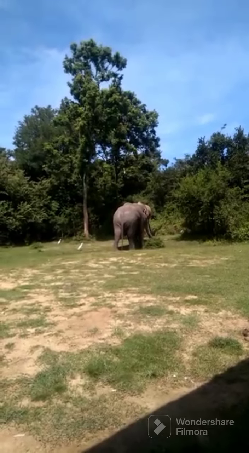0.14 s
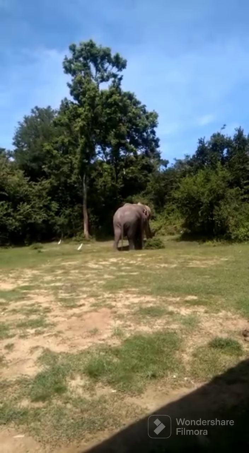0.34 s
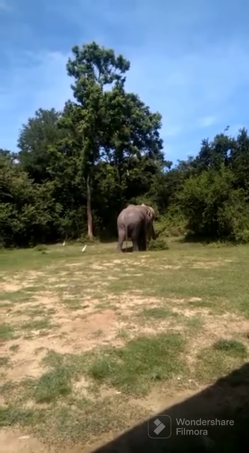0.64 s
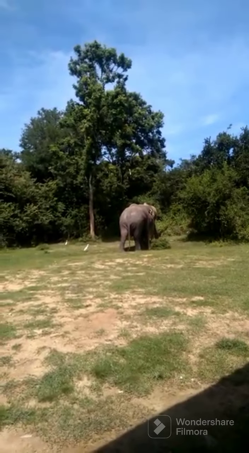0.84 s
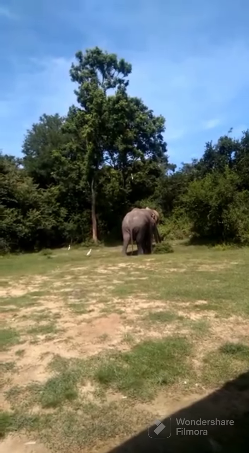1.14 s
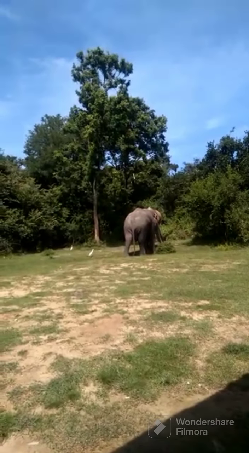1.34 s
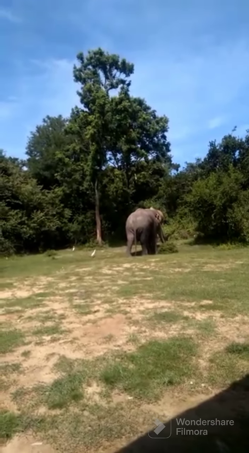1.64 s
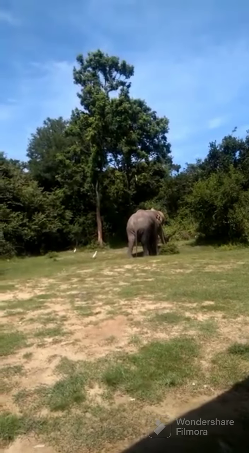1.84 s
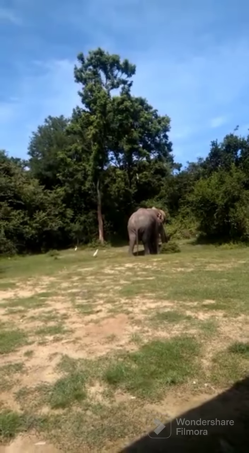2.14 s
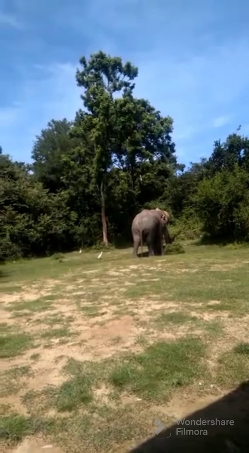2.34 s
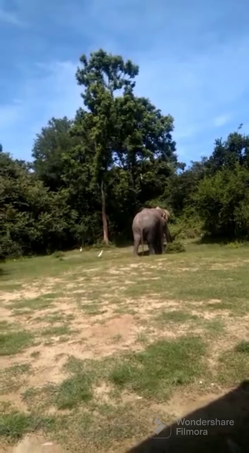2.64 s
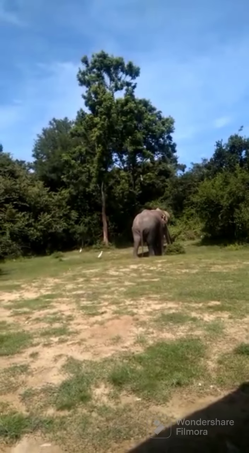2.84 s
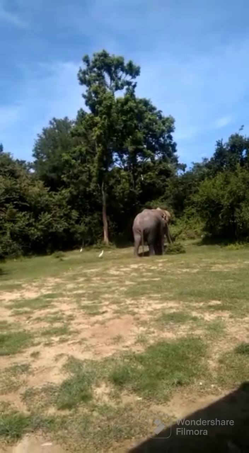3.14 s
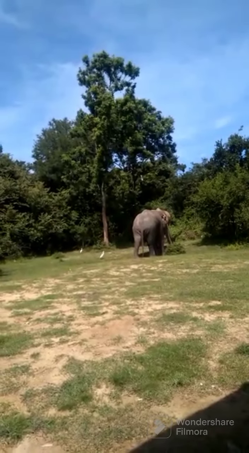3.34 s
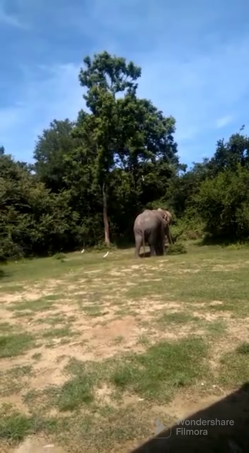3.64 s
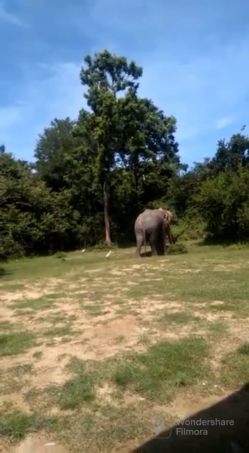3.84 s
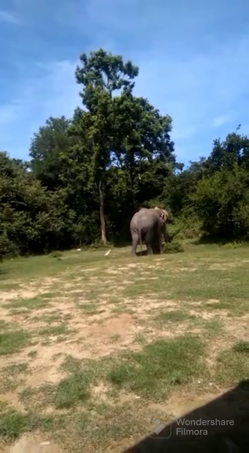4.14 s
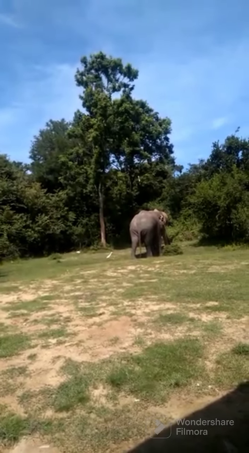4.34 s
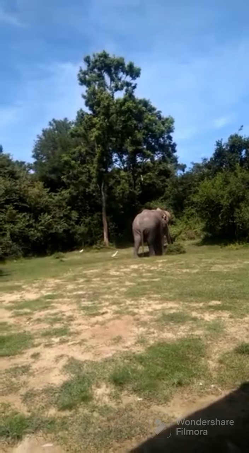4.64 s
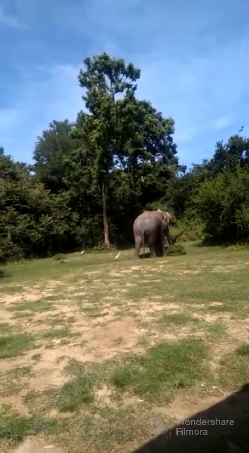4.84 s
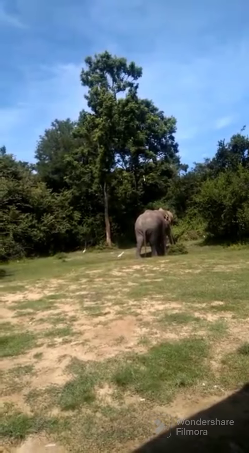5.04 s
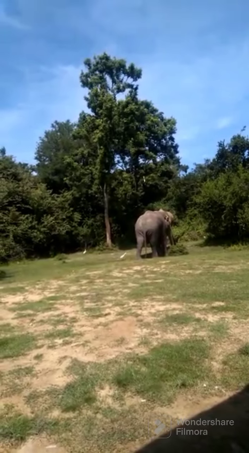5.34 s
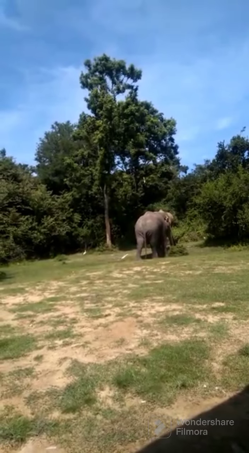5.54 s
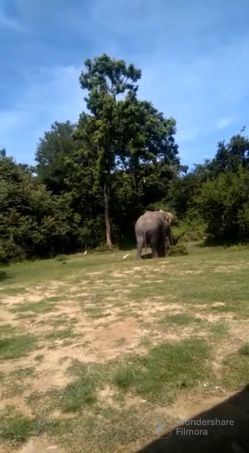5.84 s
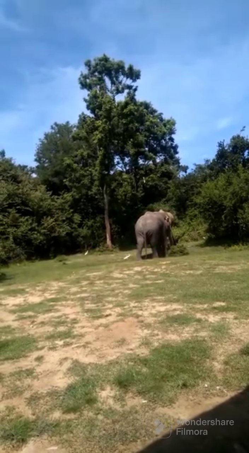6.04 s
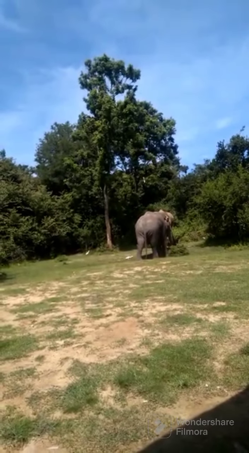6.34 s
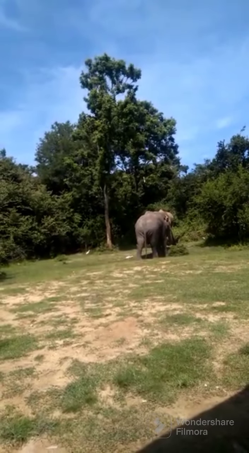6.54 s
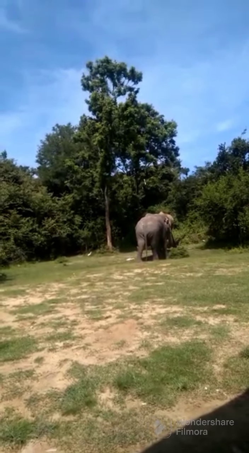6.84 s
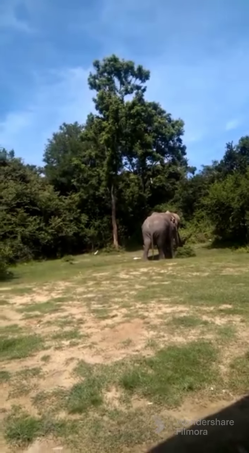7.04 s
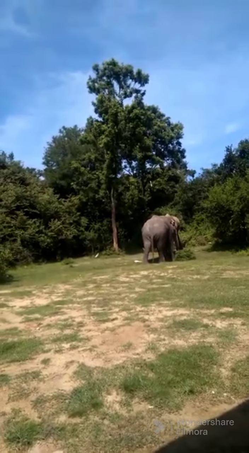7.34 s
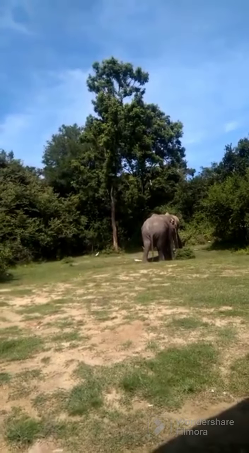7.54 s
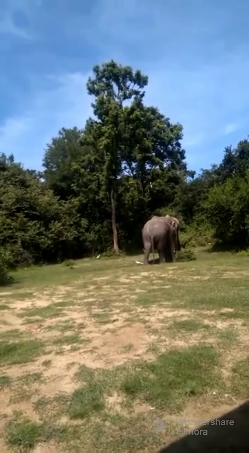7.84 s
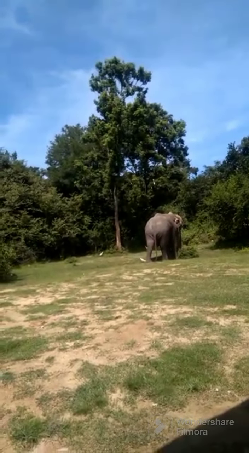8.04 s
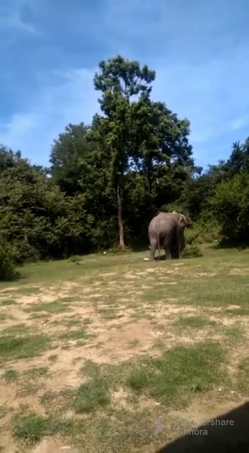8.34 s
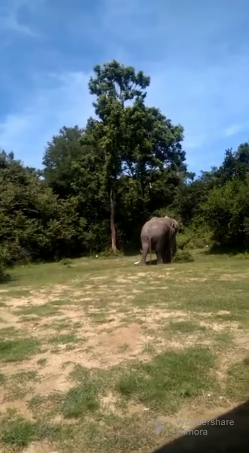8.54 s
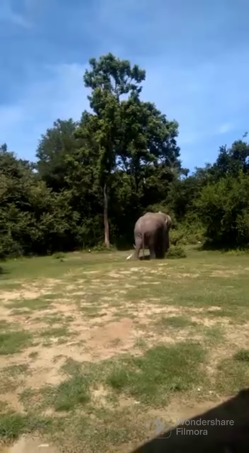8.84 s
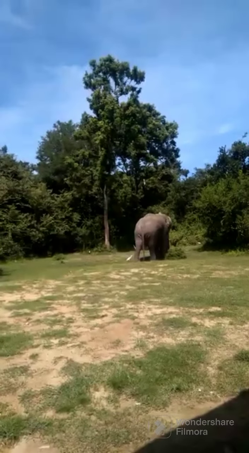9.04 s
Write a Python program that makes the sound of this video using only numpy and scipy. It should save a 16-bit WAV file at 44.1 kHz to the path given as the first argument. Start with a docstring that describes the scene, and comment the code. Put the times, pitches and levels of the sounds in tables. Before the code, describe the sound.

Rattling trills burst from a nearby animal in a quiet clearing, a farther one answers, and sparse bird whistles and hoarse caws echo among trees.

```python
"""A forest-edge clearing opens inside an animal's buzzing trill (pulse bursts through a throat) over noise-band
insects, streaky flickering noise and light wind. Thin sine notes, doves' falling whistles and hissy noise
chirps join within a second, then hoarse calls of resonated rough pulses. Near trills return at 3 and 7 s;
between them a farther animal answers, growing louder. Throughout, the phone's suppressor thins steady noise,
its input hisses, and its gate pulls everything down between loud sounds."""
import sys
import numpy as np
from scipy import signal
from scipy.io import wavfile
from scipy.ndimage import uniform_filter1d

SR = 44100
rng = np.random.default_rng(int(sys.argv[2]) if len(sys.argv) > 2 else 0)


def gain_from_db(level_db):
    """Turn a decibel level (scalar or array-like) into a linear amplitude factor."""
    decades = np.asarray(level_db, float) / 20
    return 10 ** decades


def generate_wav(sig):
    """Save sig (samples, or channels by samples) to the path in sys.argv[1] as 16-bit PCM at SR."""
    pcm = np.round(np.clip(np.atleast_2d(sig).T, -1, 1) * 32767).astype(np.int16)
    wavfile.write(sys.argv[1], SR, pcm)


N = 404823
TIME = np.arange(N) / SR


def rms_one(x):
    """Scale to rms 1."""
    return x / np.sqrt(np.mean(x ** 2) + 1e-20)


def band(x, low_hz, high_hz, order=3):
    """Butterworth band-pass."""
    return signal.sosfilt(signal.butter(order, [low_hz, high_hz], "band", fs=SR, output="sos"), x)


def drift(points_per_s):
    """Slow chance of rms 1: random points joined by straight lines."""
    return rms_one(np.interp(TIME * points_per_s, np.arange(2000), rng.standard_normal(2000)))


def throat(x, modes):
    """Parallel resonances, each applied twice so that the valleys stay dark; rms 1."""
    out = 0
    for k, (hz, width_hz, db) in enumerate(modes):
        r = np.exp(-np.pi * width_hz / SR)
        b = (1 - r * r) / 2 * np.array([1, 0, -1])
        a = [1, -2 * r * np.cos(2 * np.pi * hz / SR), r * r]
        resonance = signal.lfilter(b, a, signal.lfilter(b, a, x))
        out = out + (-1) ** k * gain_from_db(db) * resonance  # alternating polarity
    return rms_one(out)


def buzz(pulses_per_s, jitter, rough):
    """Pulses uneven in time and level, mixed with breath noise."""
    cycles = np.cumsum(pulses_per_s * (1 + jitter * drift(150)) / SR)
    pulses = np.diff(np.floor(cycles), prepend=0) * gain_from_db(3.0 * rng.standard_normal(N))
    return rms_one(pulses) + rough * rng.standard_normal(N)


def swell(start_s, length_s, rise_share):
    """Envelope 0-1: up over a share of the length, then a rounded fall."""
    share = np.clip((TIME - start_s) / length_s, 0, 1)
    return np.sin(np.pi / 2 * np.minimum(share / rise_share, (1 - share) / (1 - rise_share))) ** 2


def trees(x, wet_db, t60_s):
    """Direct sound plus the dense, decaying echoes of trunks and leaves."""
    t = TIME[:SR]
    echoes = rng.standard_normal(SR) * gain_from_db(-60 * t / t60_s) * (t > .004)
    return x + gain_from_db(wet_db) * signal.fftconvolve(x, echoes / np.linalg.norm(echoes))[:N]


def coloured(spectrum, flicker_db=0, hold_s=.1):
    """Noise of rms 1 with a spectrum in (Hz, dB); each 90 Hz strip may come and go on its own."""
    hz, t, cells = signal.stft(rng.standard_normal(N), SR, nperseg=512)
    r = np.exp(-t[1] / hold_s)
    strips = rms_one(signal.lfilter([1], [1, -2 * r, r * r], rng.standard_normal(cells.shape), axis=1))
    points = np.array(spectrum)
    colour_db = np.interp(np.log(hz + 1), np.log(points[:, 0]), points[:, 1])
    shaped = cells * gain_from_db(colour_db[:, None] + flicker_db * strips)
    return rms_one(signal.istft(shaped, SR, nperseg=512)[1][:N])


def trill(bursts, modes, pulses_per_s, burst_s, wet_db, t60_s):
    """Each burst (centre s, dB) is a short hump of fast pulses through the throat."""
    peaks = np.zeros(N)
    for centre_s, db in bursts:
        peaks[round(centre_s * SR)] = gain_from_db(db)
    hump = np.hanning(round(burst_s * SR)) ** .75
    envelope = np.maximum(signal.fftconvolve(peaks, hump, "same"), 0)
    voice = throat(buzz(pulses_per_s, jitter=.15, rough=0.65), modes)
    # steady effort within a burst
    voice = voice / np.sqrt(uniform_filter1d(voice ** 2, round(.008 * SR)) + 0.0015)
    return trees(envelope * voice, wet_db, t60_s)


# Near trills. Each row: first burst in s, first gap in s, growth of the gap in s per burst,
# drag of the last burst in s, full level in dB.
TRILLS = [(-0.2652, .03116, .00072, .026, -36), (3.0358, 0.029, .000973, 0.022, -33),
          (7.1422, .02926, .000776, .04, -33)]
# Number of bursts in each trill.
TRILL_BURSTS = [29, 28, 31]
# Weak afterthought to the second trill: centre in s, level in dB.
STRAY_BURST = (4.29, -43.5)
SWELL_DB, SWELL_BURSTS = -21, 3.1  # starting level re full, and bursts over which the gap closes
DRAG_BURSTS, TIRING_DB = 1.5, -4  # over the last bursts the drag builds and the level sags


def slowing_bursts():
    """Burst times and levels: a swell, ever longer gaps, and a dragging, weaker end."""
    rows = [STRAY_BURST]
    for (start_s, gap_s, growth_s, drag_s, db), count in zip(TRILLS, TRILL_BURSTS):
        k = np.arange(count)
        ending = np.exp((k - k[-1]) / DRAG_BURSTS)
        level_db = db + SWELL_DB * np.exp(-k / SWELL_BURSTS) + TIRING_DB * ending
        level_db = level_db + .6 * rng.standard_normal(count)
        times_s = start_s + gap_s * k + growth_s * k * k / 2 + drag_s * ending
        rows += zip(times_s, level_db)
    return [(s, db) for s, db in rows if s > 0]


# Near animal's throat. Each row: resonance in Hz, width of one pass in Hz, level in dB.
TRILL_THROAT = [(2380, 430, -20), (2930, 400, -14.5), (3670, 400, -0.5), (4010, 440, -4), (4315, 470, -2.5),
                (4798, 330, -4), (5422, 685, -13)]


def near_trills():
    """Three slowing trills, the first already under way: pulse bursts through the near throat."""
    return trill(slowing_bursts(), TRILL_THROAT, pulses_per_s=800, burst_s=.027, wet_db=-8.0, t60_s=0.85)


# Insect chorus. Each row: time in s, level in dB.
INSECTS = [(0, -58), (1, -59.5), (2, -55.5), (3, -57), (4, -60.5), (5, -62.5), (6, -62.5), (7, -62),
           (8, -57), (9.2, -63.5)]


def insects():
    """Flickering noise band near 8 kHz."""
    spectrum = [(7200, -39.5), (7600, -4), (8150, 2), (8600, -10), (9200, -6), (9600, -43.5)]
    chorus = coloured(spectrum, flicker_db=5.0, hold_s=0.021)
    return gain_from_db(np.interp(TIME, *np.transpose(INSECTS)) + 1.0 * drift(13)) * chorus


# Wind at the microphone. Each row: time in s, level in dB.
WIND = [(0, -70), (0.5, -66), (0.8, -76), (1.1, -71), (1.7, -77), (2.2, -71), (2.9, -74.5), (3.75, -64.5),
        (4.0, -72), (4.6, -75), (5.0, -69), (5.4, -77), (5.6, -68.5), (6.4, -70), (6.8, -77.5),
        (7.35, -65.5), (7.75, -76), (8.2, -56.5), (8.55, -67.5), (9.1, -63)]


def wind():
    """Lumps of low noise, strongest at 60-76 Hz, with a wandering level."""
    narrow = band(rng.standard_normal(N), 60, 76, order=2)
    wide = band(rng.standard_normal(N), 45, 140, order=2)
    level_db = np.interp(TIME, *np.transpose(WIND)) + 2.6 * drift(6)
    return gain_from_db(level_db) * rms_one(narrow + 0.32 * wide)


# Streaky noise spectrum. Each row: frequency in Hz, relative density in dB.
STREAKS = [(150, -3), (300, -4.5), (700, -9), (1300, -19), (2200, 1), (3500, -6.5), (4300, 0), (5700, 3),
           (7000, -1.5), (9300, -10.5), (11000, -14.5), (13000, -29)]
STREAKS_DB = -61


def streaks():
    """Faint coloured background noise whose narrow strips flicker, streaky like suppressor residue."""
    return gain_from_db(STREAKS_DB + 0.73 * drift(3.8)) * coloured(STREAKS, flicker_db=5.5, hold_s=.03)


# Far birds. Each row: start in s, length in s, first pitch in Hz, last pitch in Hz, dry level in dB.
NOTES = [(0.2, 0.68, 2166, 2139, -64.5), (1.074, 0.79, 2140, 2131, -63), (1.034, 0.035, 8080, 7590, -52.5),
         (1.202, 1.075, 2371, 2512, -65), (1.71, 0.036, 1466, 1415, -67), (1.742, 0.14, 2060, 1958, -61),
         (1.75, 0.21, 2996, 3163, -70.0), (1.778, 0.15, 1750.0, 1674, -66.5),
         (2.113, 0.065, 1700, 1616, -71.5), (2.136, 0.14, 2970, 2942, -70.5),
         (2.694, 0.59, 3010, 3064, -69.5), (3.243, 0.24, 2250.0, 2250.0, -63),
         (4.28, 0.44, 2386, 2386, -68.5), (4.28, 0.068, 1679, 1594, -60), (5.483, 0.089, 1868, 1840, -57.5),
         (5.506, 0.12, 2250.0, 2183, -67), (4.998, 0.17, 3320, 3080, -62),
         (5.954, 0.088, 2155, 2154, -64.5), (6.394, 0.48, 2151, 2122, -62.5),
         (6.502, 0.036, 1525, 1290, -69), (7.277, 0.55, 2443, 2444, -65), (8.659, 0.067, 1501, 1306, -59.5)]


def notes():
    """Thin sines, wavering in pitch and level, with strong echo."""
    out = np.zeros(N)
    for start_s, length_s, first_hz, last_hz, db in NOTES:
        hz = np.interp(TIME, [start_s, start_s + length_s], [first_hz, last_hz]) + 14 * drift(90)
        envelope = swell(start_s, length_s, 0.58) ** 0.13 * gain_from_db(db + 2.6 * drift(40))
        out += np.sqrt(2) * envelope * np.sin(2 * np.pi * np.cumsum(hz) / SR)
    return trees(out, wet_db=-1.5, t60_s=0.52)


# Doves. Each row: start in s, rise in s, length in s, top pitch in Hz, fall time in s,
# level in dB ahead of the strength curve.
WHISTLES = [(0.62, 0.026, .23, 2410, 0.16, -44), (4.64, 0.028, .26, 2469, .148, -39),
            (4.825, .015, .4, 2592, .125, -27), (5.18, .03, .21, 2420, .13, -39),
            (8.515, .09, .28, 2402, .165, -40.5)]
# Strength along the fall. Each row: pitch in Hz, gain in dB.
WHISTLE_STRENGTH = [(1450, -19.5), (1600, -12), (1750, -12.5), (1900, -2.5), (2050, 0), (2250, -1.5),
                    (2450, -2), (2600, -5)]
# Overtones. Each row: multiple of the pitch, level in dB re the fundamental when that is at -34 dB.
OVERTONES = [(2, -36), (3, -32.5), (4, -55), (5, -34), (6, -47.5)]
WHISTLE_REST_HZ, FALL_SHAPE = 1449, 1.25  # pitch sinks towards rest, lingering at the top first
WHISTLE_FADE_S = .03
OVERTONES_THIN_HZ, OVERTONES_THIN_DB_PER_HZ = 2080, 0.2  # below this pitch the overtones die away


def whistles():
    """Near-sine glides; patchy overtones grow faster than the fundamental with effort."""
    out = np.zeros(N)
    for start_s, rise_s, length_s, top_hz, fall_s, db in WHISTLES:
        t = np.arange(round(length_s * SR)) / SR
        part = slice(round(start_s * SR), round(start_s * SR) + len(t))
        hz = WHISTLE_REST_HZ + (top_hz - WHISTLE_REST_HZ) * np.exp(-(t / fall_s) ** FALL_SHAPE)
        level_db = db + np.interp(hz, *np.transpose(WHISTLE_STRENGTH))
        phase = 2 * np.pi * np.cumsum(hz) / SR
        thin_db = OVERTONES_THIN_DB_PER_HZ * np.minimum(hz - OVERTONES_THIN_HZ, 0)
        effort_db = 1.13 * (level_db + 34.0)
        tone = np.sin(phase)
        for k, overtone_db in OVERTONES:
            patchy_db = 3.3 * drift(35)[part]
            tone = tone + gain_from_db(overtone_db + thin_db + effort_db + patchy_db) * np.sin(k * phase)
        ramps = np.minimum(1, np.minimum(t / rise_s, (length_s - t) / WHISTLE_FADE_S))
        out[part] += gain_from_db(level_db) * tone * ramps
    out = out * gain_from_db(1.5 * drift(60))  # slight random flutter of the level
    # one strong dull echo beats against the glide
    echo = band(np.interp(TIME - .012, TIME, out), 1000, 3200, order=2)
    return trees(out + gain_from_db(-5) * echo, wet_db=-8.5, t60_s=.7)


# Chirps. Each row: start in s, length in s ahead of a 1.314 stretch, low edge in Hz, high edge in Hz,
# level in dB.
CHIRPS = [(0.789, 0.4, 7730, 8230, -51.5), (0.81, 0.35, 6560, 6900, -62), (1.009, 0.26, 7410, 7970, -62.5),
          (2.209, 0.3, 7420, 8190, -49), (2.305, 0.21, 6125, 7210, -53.5), (3.563, 0.32, 5980, 6960, -58.5),
          (3.806, 0.55, 7630, 8100, -54), (4.089, 0.16, 6000.0, 6894, -51.5), (4.26, 0.15, 2700, 3800, -54),
          (4.325, 0.17, 4200, 5400, -51.5), (4.732, 0.18, 5420, 6420, -55.5),
          (4.998, 0.14, 4205, 6000, -52), (5.154, 0.11, 5600.0, 7190, -54.5),
          (5.621, 0.066, 7800.0, 10580, -61), (5.834, 0.3, 2814, 3700, -54),
          (5.84, 0.15, 4000, 4500, -60.5), (6.241, 0.14, 1600, 2657, -62.5),
          (6.27, 0.12, 3794, 4900, -60.5), (6.643, 0.25, 2250, 2640, -59.5),
          (7.31, 0.19, 6190, 7740, -53.5), (7.616, 0.24, 7320, 8200, -53),
          (7.625, 0.27, 9500.0, 10500, -62), (7.987, 0.21, 5985, 7164, -50.5),
          (8.68, 0.16, 2647, 3130, -62.5)]


def chirps():
    """Bands of streaky, flickering hiss that start quickly and fade."""
    streaky = coloured([(100, 0), (16000, 0)], flicker_db=4.0, hold_s=0.028)
    out = np.zeros(N)
    for start_s, length_s, low_hz, high_hz, db in CHIRPS:
        hiss = rms_one(band(streaky, low_hz, high_hz, order=2))
        out += gain_from_db(db) * swell(start_s, length_s * 1.314, 0.12) * hiss
    return out * gain_from_db(0.98 * drift(40))


# Hoarse calls. Each row: start in s, length in s at 1750 Hz, relative level in dB,
# exponent by which length grows with frequency.
HOARSE = [(2.648, 0.44, -50.5, 0.63), (3.095, 0.067, -54, 0.04), (3.363, 0.58, -50, 1.13),
          (4.571, 0.37, -51.5, 0.12), (7.086, 0.54, -54, 2.7)]
# Hoarse throat. Each row: resonance in Hz, width of one pass in Hz, relative level in dB.
HOARSE_THROAT = [(1486, 87, -3.5), (1750, 260, 4), (2008, 100, -1.5), (2250, 180, -3)]


def hoarse():
    """Rough caws heavy with echo; the low edge of the fading tail rises, as if thinned by the suppressor."""
    voice = buzz(260, jitter=0.13, rough=1.7)
    out = np.zeros(N)
    for hz, width_hz, mode_db in HOARSE_THROAT:
        envelope = np.zeros(N)
        for start_s, length_s, db, growth in HOARSE:
            envelope += gain_from_db(db) * swell(start_s, length_s * (hz / 1750) ** growth, 0.17) ** .6
        out += envelope * gain_from_db(mode_db - 5.5) * throat(voice, [(hz, width_hz, 0)])
    return trees(band(out, 1280, 2450), wet_db=-1, t60_s=0.51)


# Uneven bursts of the far trill. Each entry: centre in s.
FAR_TRILL = [5.875, 6.144, 6.223, 6.295, 6.344, 6.425, 6.483, 6.55, 6.616, 6.695, 6.785, 6.874, 6.95, 7.041,
             7.113, 7.19]
# Far animal's throat. Each row: resonance in Hz, width of one pass in Hz, level in dB.
FAR_THROAT = [(2671, 380, -11.5), (3025, 180, -2), (3410, 502, -12.5), (4300, 300, -12.5)]
FAR_DB, FAR_GROWS_DB_PER_S = -52, 6.0  # level of the first burst, and its steady growth


def far_trill():
    """The answer: uneven, growing pulse bursts through another throat, with more echo."""
    bursts = [(s, FAR_DB + FAR_GROWS_DB_PER_S * (s - FAR_TRILL[0])) for s in FAR_TRILL]
    return trill(bursts, FAR_THROAT, pulses_per_s=850, burst_s=0.032, wet_db=-2.5, t60_s=0.98)


def scene():
    """All sources at the one microphone."""
    calls = near_trills() + far_trill() + whistles() + notes() + hoarse() + chirps()
    background = insects() + wind() + streaks()
    return (calls + background)[None]


def suppressor(x, share=.2, over_db=1.5, floor_db=-11, smooth_s=.03, above_hz=180):
    """Turns each 90 Hz strip down near its own usual quiet level; blotches and cut tails remain."""
    hz, t, cells = signal.stft(x, SR, nperseg=512)
    r = np.exp(-t[1] / smooth_s)
    power = signal.lfilter([1 - r], [1, -r], np.abs(cells) ** 2, axis=1) + 1e-20
    usual = np.quantile(power, share, axis=1, keepdims=True)
    gain = np.maximum(1 - gain_from_db(2 * over_db) * usual / power, gain_from_db(floor_db))
    gain[hz < above_hz] = 1
    return signal.istft(cells * gain, SR, nperseg=512)[1][:N]


# Hiss spectrum. Each row: frequency in Hz, relative density in dB.
HISS = [(150, -1.5), (400, -8), (1000, -11.5), (3000, -20), (8000, -12.5), (15500, -25.5)]
HISS_DB = -72.5


def input_hiss():
    """Steady coloured noise of the phone's input."""
    return gain_from_db(HISS_DB) * coloured(HISS)


GATE_OPEN_DB, GATE_CLOSE_DB, GATE_DEPTH_DB = -39.5, -49.6, -11


def gate(x, window_s=.003, ahead_s=.0015, move_s=.001):
    """Opens above one short-term rms level and shuts below a lower one, looking a little ahead."""
    level = np.sqrt(np.abs(uniform_filter1d(x * x, round(window_s * SR))))
    level = np.interp(TIME + ahead_s, TIME, level)
    turns = np.flatnonzero((level > gain_from_db(GATE_OPEN_DB)) | (level < gain_from_db(GATE_CLOSE_DB)))
    # between the two levels the gate holds its last state
    last_turn = turns[np.maximum(np.searchsorted(turns, np.arange(N), "right") - 1, 0)]
    shut = (level[last_turn] < gain_from_db(GATE_CLOSE_DB)) * 1.
    return x * gain_from_db(GATE_DEPTH_DB * uniform_filter1d(shut, round(move_s * SR)))


def band_limit(x):
    """A steep low-pass at the top of the band."""
    return signal.sosfilt(signal.butter(12, 15690, fs=SR, output="sos"), x)


def record(dry):
    """Phone chain: noise suppressor, input hiss, noise gate."""
    cleaned = suppressor(dry[0]) + input_hiss()
    mix = gate(cleaned)[None]
    return band_limit(mix)


dry = scene()
out = record(dry)
generate_wav(out)
```